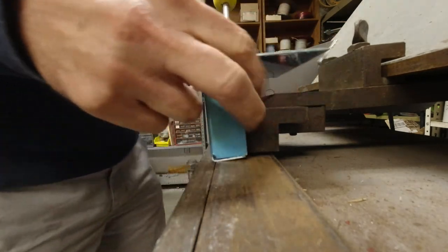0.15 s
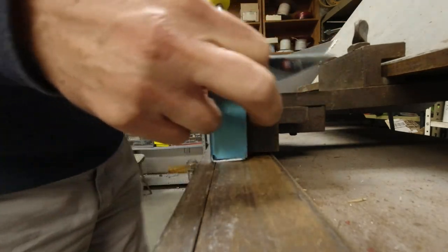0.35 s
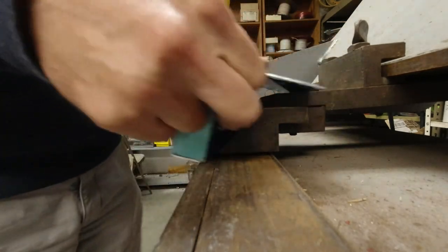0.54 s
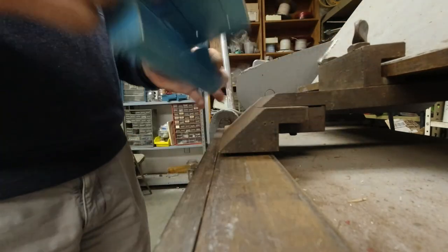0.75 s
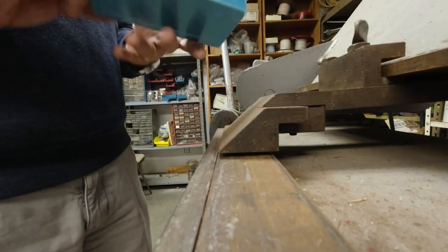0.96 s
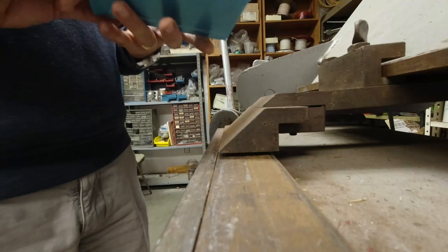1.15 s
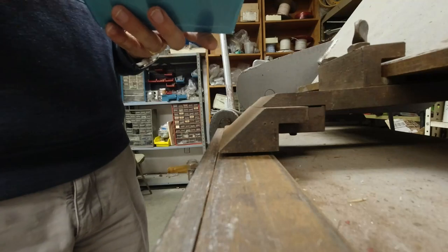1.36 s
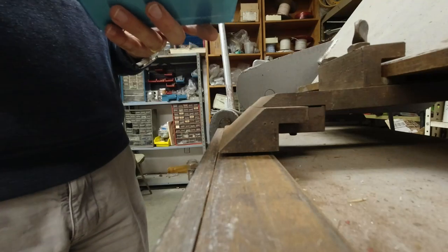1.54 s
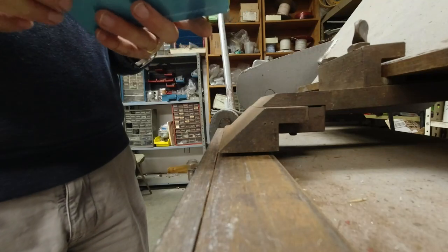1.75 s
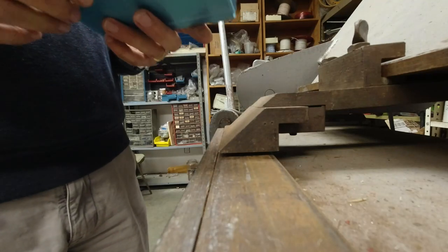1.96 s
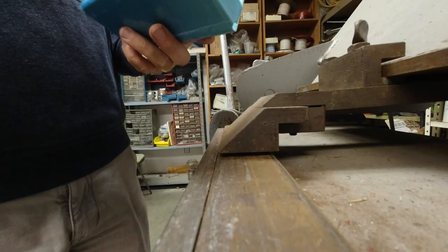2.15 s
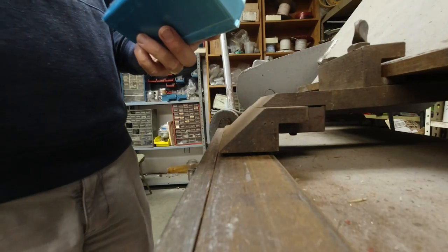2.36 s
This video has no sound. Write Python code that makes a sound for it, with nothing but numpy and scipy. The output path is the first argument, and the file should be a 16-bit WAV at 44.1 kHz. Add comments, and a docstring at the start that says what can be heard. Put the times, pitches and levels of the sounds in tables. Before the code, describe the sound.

Sheet metal clanks and scrapes, close in a quiet workshop. Faint sliding and tiny taps open; from 0.32 to 0.5 seconds three hollow knocks judder with low, ringing drag. A dull tap at 0.56 precedes a loud sharp snap at 0.63 and bright scraping until 0.74. The tray briefly rings on; then faint finger rubs, small ticks and pops, low room tone and a weak wavering hum.

```python
"""In a quiet workshop, heard close by, a folded sheet-metal tray is pulled out of a bending brake.
It slides and judders against the brake's steel leaf, taps it, snaps free and scrapes over the edge; then
fingers turn the ringing tray in the air, over bench rumble, room tone and a wavering hum.
Rubbing is grainy noise through resonant bodies; impacts are pulses, noise bursts and decaying modes.
Phase differences that wander over time and frequency spread each source between two channels."""
import sys
import numpy as np
from scipy import signal
from scipy.fft import rfft, irfft, next_fast_len
from scipy.io import wavfile
from scipy.ndimage import uniform_filter1d, map_coordinates

SR = 44100
rng = np.random.default_rng(int(sys.argv[2]) if len(sys.argv) > 2 else 0)


def waveform_to_disk(signal):
    """Save audio, clipped to [-1, 1], as 16-bit WAV at the path in sys.argv[1]."""
    frames = np.transpose(np.atleast_2d(signal))
    scaled = np.clip(frames, -1, 1) * 32767
    samples = np.round(scaled).astype(np.int16)
    wavfile.write(sys.argv[1], SR, samples)


N = 110250
T = np.arange(N) / SR  # t/s of each sample

# Bench rumble under the work: [t/s, level/dB]; its spectrum: [f/Hz, relative level/dB]
RUMBLE_LEVEL = [(0.0, -46.5), (0.036, -47.5), (0.078, -46.5), (0.174, -55.5), (0.254, -40.5), (0.29, -48),
                (0.362, -35), (0.492, -40.5), (0.524, -45.5), (0.572, -40), (0.7, -59.5), (0.746, -53),
                (0.768, -68), (0.88, -60)]
BENCH_SPECTRUM = [(15, -28.5), (30, -10.5), (60, -9), (98, -5.5), (130, -11), (170, -16.5), (300, -17.5),
                  (450, -23.5), (700, -78.5)]
# Low bumps through the bench, before a gentle low cut: [t/s, level/dB, length/s]
BENCH_BUMPS = [(1.066, -45, 0.014), (1.51, -48, 0.0082), (2.22, -47, 0.024), (2.478, -35, 0.014)]
# Room tone spectrum: [f/Hz, relative level/dB]
AIR_SPECTRUM = [(15, -17.5), (40, -11.5), (64, -2), (95, -9), (125, -3.5), (165, -14.5), (330, -21.5),
                (600, -25), (800, -27.5), (1500, -35.5), (4000, -40.5), (8000, -51.5), (16000, -67)]
AIR_DB = -63.5  # rms level
# Wavering hum: [t/s, rms level/dB]
HUM_LEVEL = [(1.2, -95), (1.242, -94), (1.268, -77.5), (1.362, -68), (1.546, -68.5), (1.63, -88),
             (1.702, -67.5), (1.826, -67), (1.844, -78.5), (1.97, -62), (2.0, -72), (2.014, -98),
             (2.05, -68.5), (2.238, -76.5), (2.268, -66.5), (2.416, -74), (2.448, -94), (2.5, -70)]
HUM_HZ, HUM_RISE_HZ_PER_S = 201.5, 17

# Tray sliding while clamped, then scraping free; two tables: [t/s, ring level/dB, low level/dB, hiss level/dB]
SCRAPE_LEVELS = [
    [(0.0, -47, -46, -58), (0.03, -73, -58.5, -70), (0.044, -51, -68.5, -74), (0.066, -63, -55.5, -52),
     (0.104, -44.5, -52.5, -49), (0.156, -60.5, -58, -65), (0.26, -49.5, -49.5, -58.5),
     (0.288, -57, -53.5, -72), (0.31, -51.5, -55, -68.5)],
    [(0.61, -44.5, -44, -63), (0.622, -41, -45.5, -55), (0.632, -25.5, -37.5, -42),
     (0.65, -31.5, -34.5, -43.5), (0.68, -30.5, -39, -39), (0.694, -29.5, -32.5, -42.5),
     (0.706, -27.5, -39, -43.5), (0.726, -28.5, -39.5, -43), (0.744, -59, -50, -57.5),
     (0.776, -62.5, -60, -72.5), (0.806, -67, -57.5, -60), (0.862, -69, -67, -79.5),
     (0.9, -91, -80, -101.5)],
]
# Modes of the tray still clamped: [f/Hz, width/Hz, relative level/dB]
CLAMPED_MODES = [(330, 60, -4), (980, 140, -2), (1893, 39, -0.5), (2640, 120, -12.5), (4650, 120, -18.5),
                 (5604, 210, -12), (9000, 380, -20.5)]
# Modes of the tray against the edge: [f/Hz, width/Hz, relative level/dB]
EDGE_MODES = [(317, 83, -15), (523, 40, -2.5), (917, 95, -3.5), (1085, 21, -18), (1245, 28, -13.5),
              (1650, 66, -2), (1718, 60, -4), (1862, 60, -3.5), (2050, 58, -13.5), (2482, 46, -12),
              (2577, 40, -13), (2805, 45, -12), (3264, 41, -14), (3430, 65, -13.5), (3880, 55, -21.5),
              (4920, 45, -12.5)]
# Smooth response beneath both sets of modes: [f/Hz, relative level/dB]
EDGE_SPECTRUM = [(200, -21.5), (500, -19.5), (1000, -16.5), (1500, -26), (2200, -19.5), (4000, -20),
                 (6000, -29), (9200, -30.5), (16000, -42)]
EDGE_SPECTRUM_DB = 1.5  # raises the smooth response against the modes
# Instants at which the scrape catches: [t/s, level/dB]; modes they ring: [f/Hz, relative level/dB, t60/s]
SLIPS = [(0.6897, -12.5), (0.706, -18), (.714, -21), (0.722, -23)]
SLIP_MODES = [(945, -6, 0.041), (1637, -0.5, 0.04), (1840, -1, .045), (2650, -20, .04), (4810, -17, 0.041)]
SLIP_RISE_S = 0.004  # time constant
GRAINS_PER_S, GRAIN_SPREAD_DB, SKIN_SPREAD_DB = 2500, 0.5, 2

# Decay of the room's answer: [f/Hz, t60/s]
ROOM_DECAY = [(200, .4), (2000, 0.4), (10000, 0.2)]
ROOM_DB = -20.5

# Soft contacts, before the wall's response and TAP_DB: [t/s, level/dB]
TAPS = [(0.228, -38), (0.2337, -29), (0.2386, -28), (0.2457, -34), (0.255, -37.5), (0.266, -39),
        (0.5597, -14), (0.578, -31)]
TAP_S, TAP_DB = 0.0005, 10.5  # push length, added level
# Tray wall held damped, before the response is cubed: [f/Hz, width/Hz, level/dB]
WALL_MODES = [(501, 140, 0.5), (984, 220, 3.5), (1790, 190, -1.5)]

# Knocks on the leaf, before the levels of their parts: [t/s, level/dB]
JUDDERS = [(0.3181, -8), (0.3774, -9.5), (.438, -10.5), (.49, -31.5)]
KNOCK_T60, KNOCK_LOW_DB, KNOCK_HIGH_DB = 0.022, -11.5, -16  # decay/s, band levels
# Tray dragged on the leaf: [t/s, low level/dB, mid level/dB, hiss level/dB]
DRAG_LEVELS = [(.317, -50.5, -54.5, -71.5), (.32, -23.5, -35, -61.5), (.335, -24, -32, -71),
               (.36, -27, -38.5, -67.5), (.374, -32.5, -38.5, -68), (.38, -28.5, -34.5, -63.5),
               (.4, -24, -39, -60.5), (.432, -38.5, -46, -58), (.44, -32, -38, -53), (.46, -30, -42.5, -66),
               (.49, -31, -47.5, -62.5), (.51, -40, -53, -60.5), (.55, -37.5, -56, -56.5),
               (.6, -45, -61, -67.5), (.62, -49, -67.5, -70)]
# Modes of the steel leaf: [f/Hz, width/Hz, relative level rubbed/dB, relative level struck/dB]
LEAF_MODES = [(253.6, 7.3, -5.5, -21.5), (313, 14, -11, -24), (430, 25, -5, -19.5),
              (525.8, 3.1, 0.5, -22.5), (626, 25, -7.5, -20), (683, 18, -10, -23), (729.4, 12, 0, -14),
              (792, 23, -7, -15.5), (869.4, 28, -7.5, -8), (1037, 25, -10.5, -19), (1148, 20, -9, -19.5),
              (1350, 30, -13, -20.5), (1795, 35, -18, -26.5), (2140, 49, -21.5, -23.5),
              (3410, 140, -17.5, -8), (4790, 120, -17.5, -15.5)]
# Dense leaf modes between them: [f/Hz, relative level/dB]
LEAF_SPECTRUM = [(88, -44.5), (150, -21), (248, -10), (477, -7.5), (883, -9), (1570, -15), (3400, -17),
                 (3970, -17.5), (15000, -47.5)]
LEAF_SPECTRUM_DB = -4.5  # shifts the dense modes against the separate ones
LEAF_SPLIT_HZ, LEAF_HISS_HZ = 1600, 6500
LEAF_DAMPED_S, LEAF_DAMP_T60 = 0.61, 0.12  # start and t60/s of the damping

# Edge springing free: [t/s, level/dB]
SNAPS = [(0.6315, -21.5), (.6328, -13), (0.6351, -14), (0.6445, -27)]
# Spectrum of the crack: [f/Hz, relative level/dB]; modes of the thunk: [f/Hz, relative level/dB, t60/s]
SNAP_SPECTRUM = [(120, -49), (200, -9.5), (1870, -7), (3430, -10), (4530, -28.5), (5350, -18),
                 (6320, -16.5), (12500, -14.5), (15300, -23), (16500, -33)]
SNAP_MODES = [(440, -8.5, 0.039), (1130, -10, .02), (1796, -7, 0.018), (2480, -10.5, .025),
              (3080, -13.5, 0.033)]
SNAP_T60, SNAP_DB, SNAP_TOP_HZ = 0.0077, 0, 15300
CLICK_DB = 4  # added to the pulse fronts

# Free tray left ringing: [f/Hz, relative level/dB, t60/s]
AFTER_RING = [(284, -6, .9), (315, -0.5, 0.96), (422, -10, 0.66), (786, -7.5, 0.98), (1330, -16.5, .9),
              (1860, -9, .4)]
LET_GO_S, LET_GO_DB = 0.67, -47.5
# Fingers tapping the tray, each ringing one mode: [t/s, f/Hz, level/dB, t60/s]
PINGS = [(1.359, 944, -56, 0.08), (1.369, 1125, -55, 0.14), (2.139, 1070, -65, 0.29)]
# Fingers rubbing the tray, two tables: [t/s, low level/dB, mid level/dB, treble level/dB]
FINGER_LEVELS = [
    [(0.86, -67.5, -61, -71), (0.91, -74, -79, -107.5), (0.962, -60, -65.5, -101), (1.032, -88, -87, -104),
     (1.052, -70.5, -82, -96), (1.066, -58, -63.5, -77), (1.09, -67, -73, -83), (1.116, -58, -64, -63.5),
     (1.15, -72.5, -76, -75), (1.212, -81, -86, -86.5), (1.25, -89, -89, -89), (1.278, -68, -79, -99),
     (1.324, -76.5, -76.5, -95), (1.372, -71.5, -71, -73), (1.452, -94, -101, -106), (1.46, -75, -88, -113)],
    [(1.86, -88, -106, -105), (1.894, -68.5, -78.5, -106), (1.918, -74, -82.5, -113),
     (1.984, -78, -74.5, -100), (2.005, -64, -62.5, -62), (2.035, -81, -76, -82), (2.076, -68.5, -69, -91),
     (2.122, -65.5, -64.5, -77), (2.176, -67.5, -60, -67), (2.23, -72, -69, -74.5),
     (2.258, -78.5, -77.5, -87), (2.324, -72, -74, -98), (2.38, -87.5, -87, -107), (2.464, -66, -68.5, -99),
     (2.474, -83, -70, -99), (2.5, -54.5, -61, -60.5)],
]
# Fingertips landing on the tray, before FLICK_DB and the tray's response: [t/s, level/dB]
FLICKS = [(0.944, -61), (1.065, -51.5), (1.112, -54.5), (1.278, -59), (1.892, -71)]
FLICK_DB = 4.5
# Modes of the free tray: [f/Hz, width/Hz, relative level/dB]
TRAY_MODES = [(867.4, 13, -2), (1339, 11, 3.5), (1481, 20.6, -6.5), (1623, 38, -7), (1913, 34, -5.5),
              (2900, 120, -11.5), (3240, 63, -12.5), (3800, 29, -7.5), (4390, 19.5, -13), (7900, 66, -21.5),
              (9270, 42, -26), (10870, 250, -31.5)]
# Smooth response beneath the tray's modes: [f/Hz, relative level/dB]
TRAY_SPECTRUM = [(400, -10), (700, -6.5), (1500, -10.5), (2450, -58), (3300, -7.5), (5000, -16.5),
                 (6800, -29.5), (9500, -21.5), (14000, -43.5)]
TRAY_SPECTRUM_DB = -10.5

# Scatter of the left-right phase difference, for background, near work, snaps and tray: [f/Hz, rms phase/rad]
AIR_TURN = [(40, 0.59), (200, 0.31), (800, 0.9), (1600, 4.4), (4000, 7.5)]
NEAR_TURN = [(40, .7), (150, .2), (1000, 0.76), (1800, 1.5), (3000, 2.4), (8000, 2.3)]
SNAP_TURN = [(500, .2), (10000, 0.98)]
HAND_TURN = [(300, 0.35), (2000, 0.7), (5000, 1.6), (10000, 2.8)]
HAND_LAG_S, SNAP_LAG_S = -0.00012, -0.00006  # negative: the left channel leads
TOP_HZ = 16700


def amp(db):
    """Level as an amplitude ratio: 20 dB for each factor of ten."""
    return 10 ** (np.asarray(db) / 20)


def unit(x):
    """Normalisation to unit rms."""
    return x / np.sqrt(np.mean(x ** 2) + 1e-20)


def along(points, hz):
    """Linear interpolation of (f/Hz, value) on a logarithmic frequency axis."""
    f, v = np.transpose(points)
    return np.interp(np.log(hz + 1), np.log(f + 1), v)


def gains(*tables):
    """Envelopes, one per level column, with 10 ms fades to silence outside each table."""
    out = 0
    for rows in tables:
        s, *columns = np.transpose(rows)
        fade = np.clip(np.minimum(T - s[0], s[-1] - T) * 100 + 1, 0, 1)
        out = out + fade * amp([np.interp(T, s, column) for column in columns])
    return out


def wobble(rate, size=N):
    """Slow random modulation: a smooth curve through `rate` Gaussian knots a second."""
    knots = rng.standard_normal(int(N * rate / SR) + 4)
    return map_coordinates(knots, [T[:size] * rate])


def filtered(x, response):
    """Linear filtering: the spectrum times a complex response of frequency."""
    m = next_fast_len(N + SR // 2)
    return irfft(rfft(x, m) * response(np.fft.rfftfreq(m, 1 / SR)), m)[..., :N]


def body(modes, broad=None, broad_db=-120):
    """Modal superposition: resonances of alternating sign over an optional smooth response."""
    def response(f):
        peaks = 0
        for k, (centre, width, db) in enumerate(modes):
            resonance = 1j * f * width / (centre * centre - f * f + 1j * f * width)
            peaks = peaks + (-1) ** k * amp(db) * resonance
        return peaks if broad is None else peaks + amp(broad_db + along(broad, f))
    return response


def band(response, lo_hz, hi_hz):
    """Band limitation, scaled so that white noise of unit rms leaves at unit rms."""
    def part(f):
        r = response(f) / (1 + (lo_hz / (f + 1)) ** 4) / (1 + (f / hi_hz) ** 4)
        return r / np.sqrt(np.mean(abs(r) ** 2))
    return part


def grit(spread_db=GRAIN_SPREAD_DB):
    """Friction as random excitation: steady noise roughened by dense grains of uneven size."""
    struck = rng.random(N) < GRAINS_PER_S / SR
    size = amp(spread_db * rng.exponential(size=N))
    grains = struck * size * rng.standard_normal(N)
    return unit(unit(grains) + rng.standard_normal(N))


def bursts(events, t60):
    """Impact excitation: exponentially decaying noise at each (t/s, level/dB)."""
    x, t = np.zeros(N + SR), T[:SR // 4]
    for s, db in events:
        x[round(s * SR):][:len(t)] += amp(db - 60 * t / t60) * rng.standard_normal(len(t))
    return x[:N]


def pushes(events):
    """Soft-contact excitation: a raised-cosine pulse at each (t/s, level/dB, length/s)."""
    x = np.zeros(N + SR)
    for s, db, length in events:
        push = np.hanning(max(4, round(length * SR)))
        x[round(s * SR):][:len(push)] += amp(db) * push
    return x[:N]


def ring(s, hz, db, t60, rise_s=0.00082):
    """Free vibration: one decaying mode whose level wavers slightly."""
    x, start = np.zeros(N), round(s * SR)
    t = T[:min(N - start, int(2 * t60 * SR))]
    decay = amp(db - 60 * t / t60 + 1.5 * wobble(33, size=len(t)))
    x[start:][:len(t)] = decay * np.sin(2 * np.pi * hz * t) * (1 - np.exp(-t / rise_s))
    return x


def placed(x, turn, lag_s=0.):
    """Interchannel phase: a fixed lag plus a difference wandering over time and frequency."""
    hz, _, z = signal.stft(x, SR, nperseg=512, noverlap=384)
    field = uniform_filter1d(rng.standard_normal(z.shape), size=4, axis=0)
    field = unit(uniform_filter1d(field, size=16, axis=1))
    half = along(turn, hz)[:, None] * field / 2 - np.pi * hz[:, None] * lag_s
    channels = z * np.exp(1j * np.array([half, -half]))
    return signal.istft(channels, SR, nperseg=512, noverlap=384)[1][:, :N]


def coloured_noise(spectrum):
    """Spectral shaping: white noise filtered to a smooth spectrum at unit rms."""
    return unit(filtered(rng.standard_normal(N), lambda f: amp(along(spectrum, f))))


def background():
    """Stationary and slowly modulated sources: bench rumble and bumps, room tone, a frequency-modulated hum."""
    rumble = gains(RUMBLE_LEVEL)[0] * coloured_noise(BENCH_SPECTRUM)
    air = amp(AIR_DB) * coloured_noise(AIR_SPECTRUM)
    hum_hz = HUM_HZ + HUM_RISE_HZ_PER_S * T + 1.76 * wobble(7.4)
    hum = gains(HUM_LEVEL)[0] * np.sqrt(2) * np.sin(2 * np.pi * np.cumsum(hum_hz) / SR)
    bumps = filtered(-pushes(BENCH_BUMPS), lambda f: 1j * f / (25 + 1j * f))  # 25 Hz low cut
    return placed(rumble + air + hum + bumps, AIR_TURN)


def edge():
    """Friction-driven resonance: a light clamped slide, then scraping over the edge that catches and rings."""
    out = sum(ring(s, hz, db + level, t60, SLIP_RISE_S) for s, db in SLIPS for hz, level, t60 in SLIP_MODES)
    bands_hz = [(1250, 4800), (150, 1250), (4800, 17000)]  # ring, low, hiss
    for modes, table in zip((CLAMPED_MODES, EDGE_MODES), SCRAPE_LEVELS):
        steel = body(modes, EDGE_SPECTRUM, EDGE_SPECTRUM_DB)
        for gain, (lo_hz, hi_hz) in zip(gains(table), bands_hz):
            out = out + filtered(gain * grit(), band(steel, lo_hz, hi_hz))
    return out


def shop(x):
    """Reverberation: convolution with two-channel noise whose decay time depends on frequency."""
    hz, t, z = signal.stft(rng.standard_normal((2, SR // 2)), SR, nperseg=256)
    tail = signal.istft(z * amp(-60 * t / along(ROOM_DECAY, hz)[:, None]), SR, nperseg=256)[1]
    delayed = np.pad(x, (500, 0))[None]  # samples before the room answers
    return signal.fftconvolve(delayed, tail / np.linalg.norm(tail[0]), axes=1)[:, :N]


def taps():
    """Damped impulse response: soft contacts swell and die in the held wall, its resonance cubed."""
    contacts = pushes([(s, db + TAP_DB, TAP_S) for s, db in TAPS])
    return -filtered(contacts, lambda f: body(WALL_MODES)(f) ** 3)


def leaf():
    """Modal excitation: knocks and drag ring the steel leaf, which is damped as the tray leaves it."""
    steel = body([mode[:3] for mode in LEAF_MODES], LEAF_SPECTRUM, LEAF_SPECTRUM_DB)
    low, high, hiss = gains(DRAG_LEVELS)
    knocks = bursts(JUDDERS, KNOCK_T60)
    damped = amp(-60 * np.maximum(T - LEAF_DAMPED_S, 0) / LEAF_DAMP_T60)
    low_part = filtered(low * grit() + amp(KNOCK_LOW_DB) * knocks, band(steel, 100, LEAF_SPLIT_HZ))
    high_part = filtered(high * grit() + amp(KNOCK_HIGH_DB) * knocks, band(steel, LEAF_SPLIT_HZ, LEAF_HISS_HZ))
    hiss_part = filtered(hiss * grit(), band(np.ones_like, LEAF_HISS_HZ, 11000))
    rings = 0
    for s, db in JUDDERS:
        for hz, width, _, level in LEAF_MODES:
            t60 = 3 * np.log(10) / np.pi / width  # a narrow mode decays slowly
            rings = rings + ring(s, hz, db + level, t60)
    return damped * (low_part + high_part + hiss_part + rings)


def snaps():
    """Elastic release: pulses of alternating sign and noise make a sharp crack, short modes a thunk."""
    fronts = np.zeros(N)
    for k, (s, db) in enumerate(SNAPS):
        fronts[round(s * SR)] = -(-1) ** k * amp(db + CLICK_DB)
    source = fronts + amp(SNAP_DB) * bursts(SNAPS, SNAP_T60)
    crack = filtered(source, band(lambda f: amp(along(SNAP_SPECTRUM, f)), 100, SNAP_TOP_HZ))
    return crack + sum(ring(s, hz, db + level, t60) for s, db in SNAPS for hz, level, t60 in SNAP_MODES)


def tray():
    """Free and forced vibration: the freed tray rings out, fingers tap single modes, rub and flick its modes."""
    rings = sum(ring(LET_GO_S, hz, LET_GO_DB + db, t60) for hz, db, t60 in AFTER_RING)
    tapped = sum(ring(*ping) for ping in PINGS)
    steel = body(TRAY_MODES, TRAY_SPECTRUM, TRAY_SPECTRUM_DB)
    rubbed = 0
    for gain, (lo_hz, hi_hz) in zip(gains(*FINGER_LEVELS), [(370, 2664), (2070, 8700), (8300, 12000)]):
        rubbed = rubbed + filtered(gain * grit(SKIN_SPREAD_DB), band(steel, lo_hz, hi_hz))
    flicked = filtered(amp(FLICK_DB) * bursts(FLICKS, t60=0.0082), band(steel, 360, 4600))
    return rings + tapped + rubbed + flicked


def scene():
    """Superposition of the direct sounds, the room's answer and the background."""
    near, snap = edge() + taps() + leaf(), snaps()
    direct = placed(near, NEAR_TURN) + placed(snap, SNAP_TURN, SNAP_LAG_S)
    turned = placed(tray(), HAND_TURN, HAND_LAG_S)
    return background() + direct + turned + amp(ROOM_DB) * shop(near + snap)


def record(dry):
    """Band limitation: every component at or above TOP_HZ is removed."""
    return filtered(dry, lambda hz: hz < TOP_HZ)


dry = scene()
out = record(dry)
waveform_to_disk(out)
```